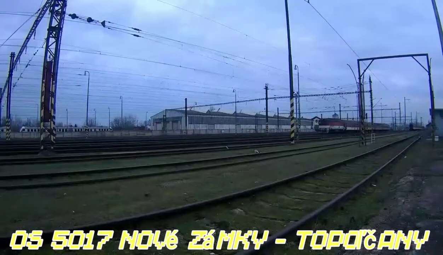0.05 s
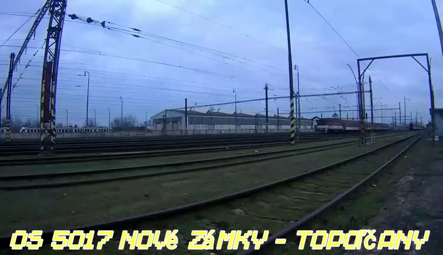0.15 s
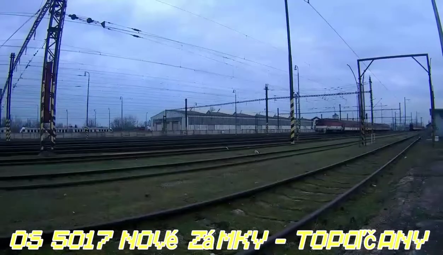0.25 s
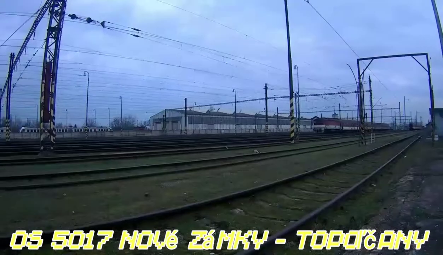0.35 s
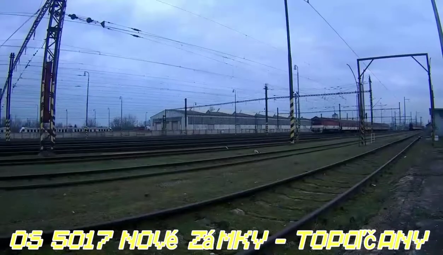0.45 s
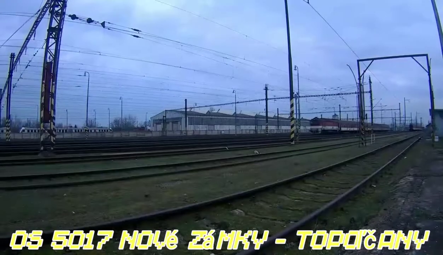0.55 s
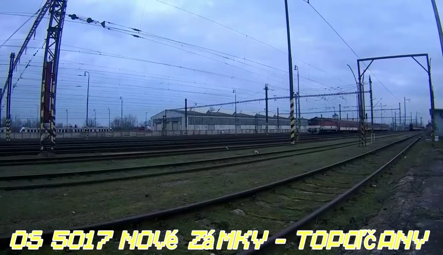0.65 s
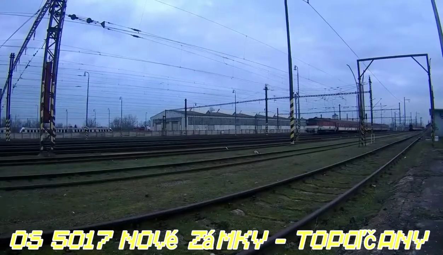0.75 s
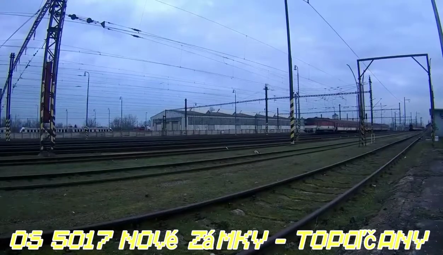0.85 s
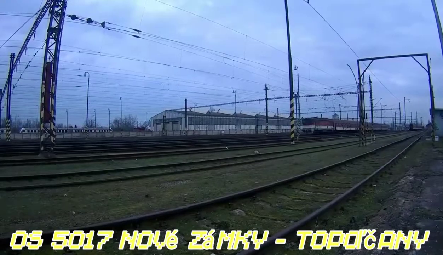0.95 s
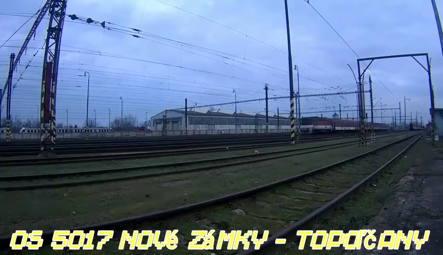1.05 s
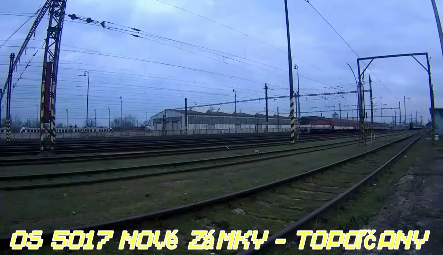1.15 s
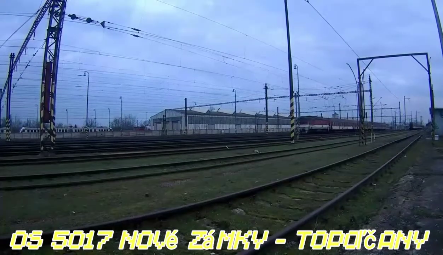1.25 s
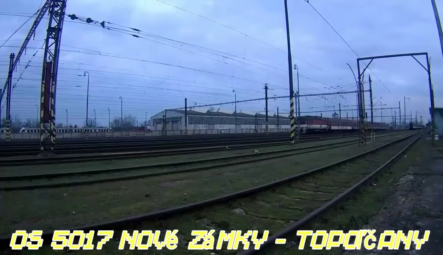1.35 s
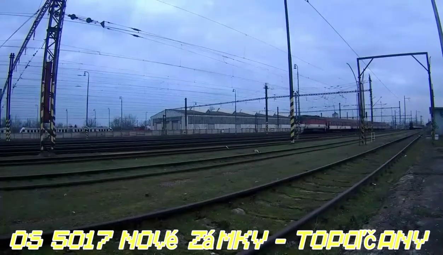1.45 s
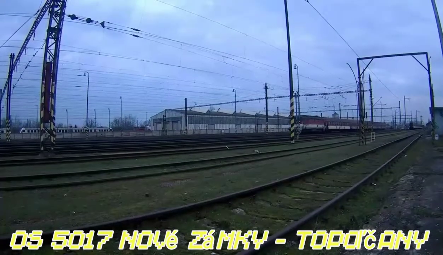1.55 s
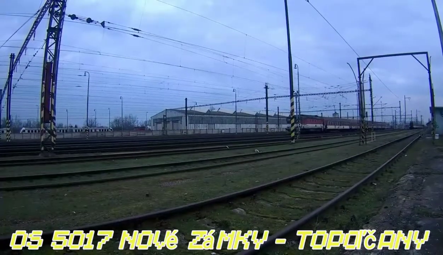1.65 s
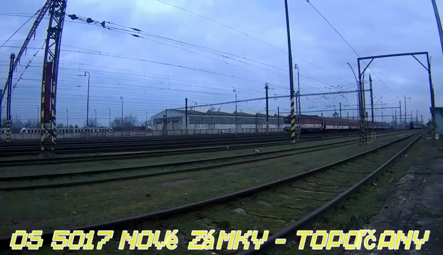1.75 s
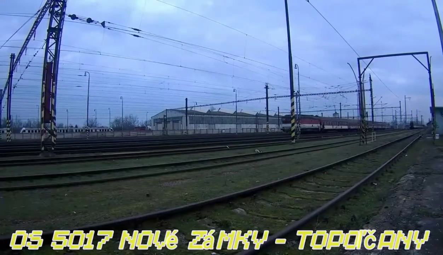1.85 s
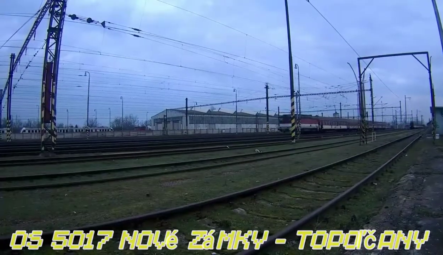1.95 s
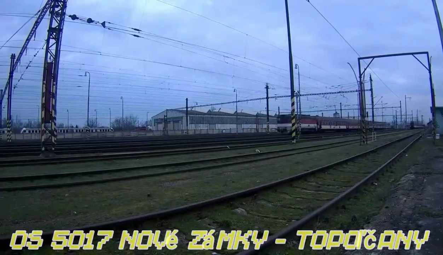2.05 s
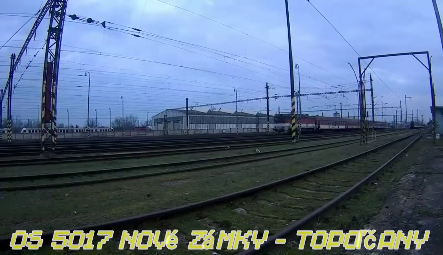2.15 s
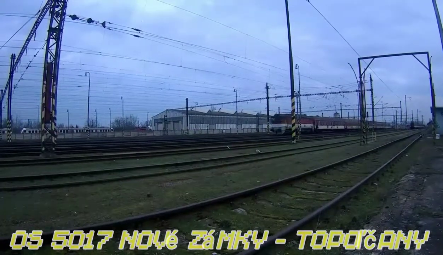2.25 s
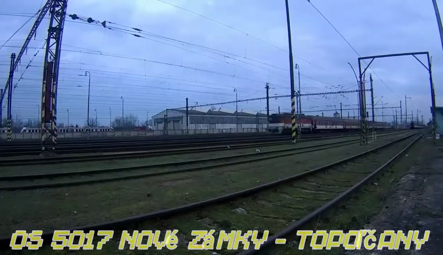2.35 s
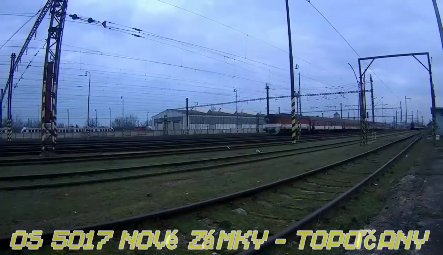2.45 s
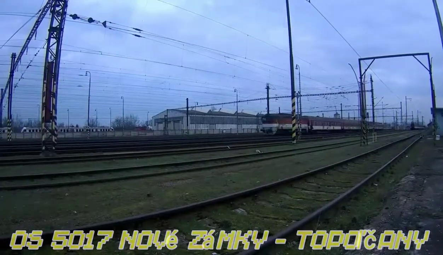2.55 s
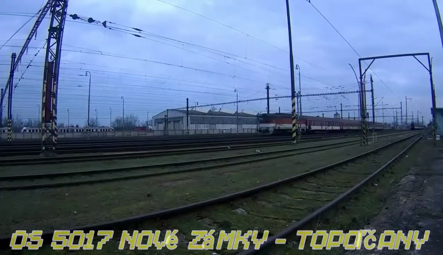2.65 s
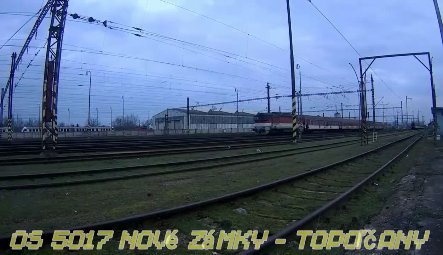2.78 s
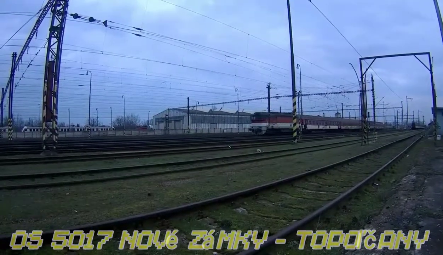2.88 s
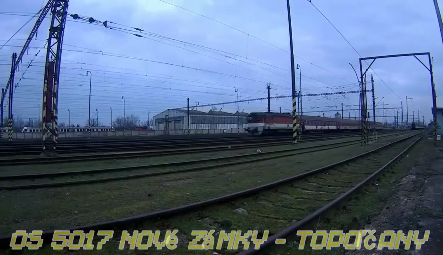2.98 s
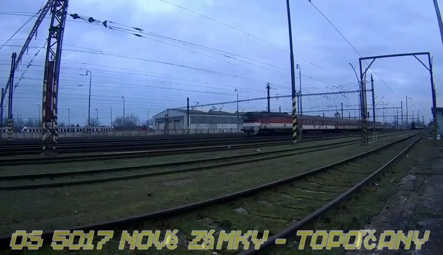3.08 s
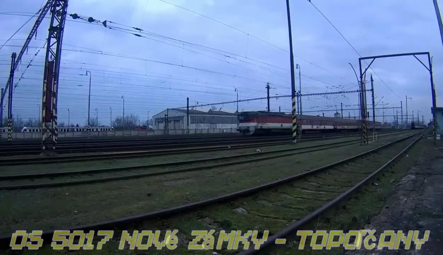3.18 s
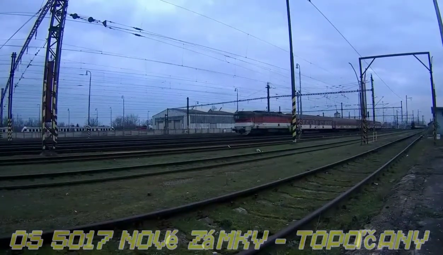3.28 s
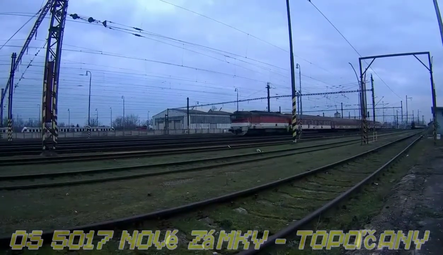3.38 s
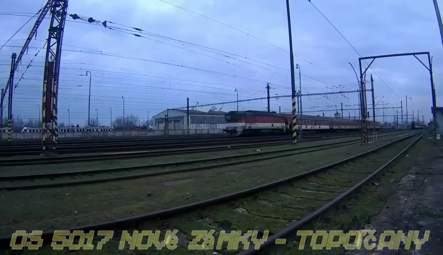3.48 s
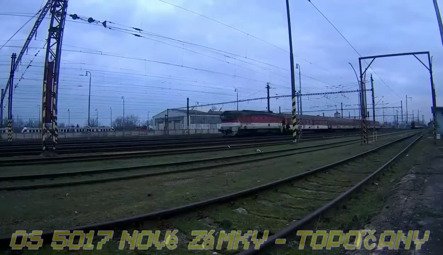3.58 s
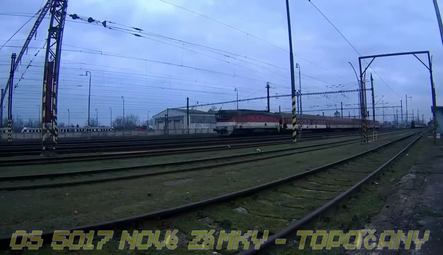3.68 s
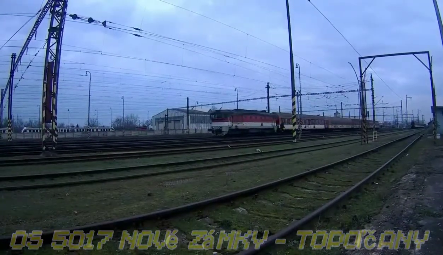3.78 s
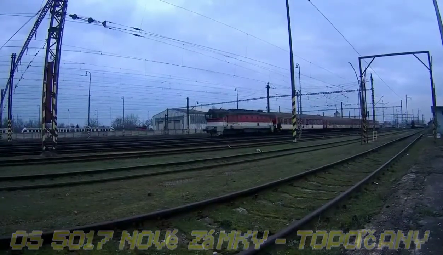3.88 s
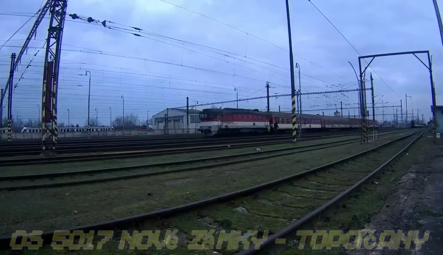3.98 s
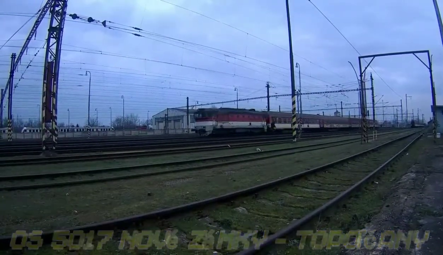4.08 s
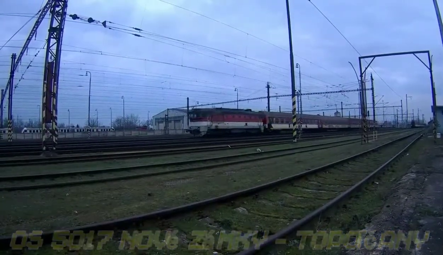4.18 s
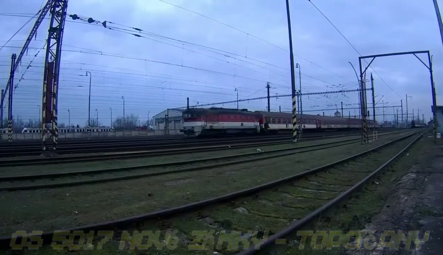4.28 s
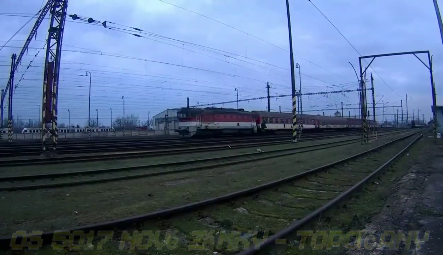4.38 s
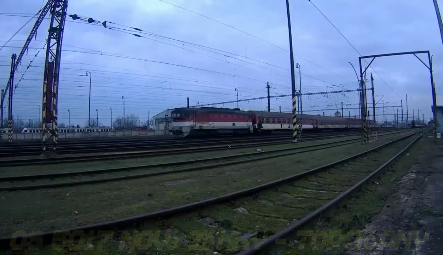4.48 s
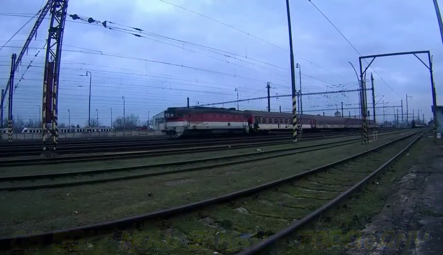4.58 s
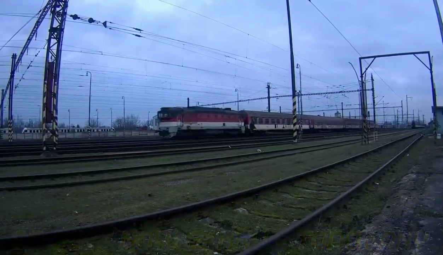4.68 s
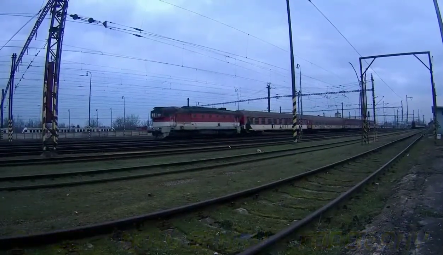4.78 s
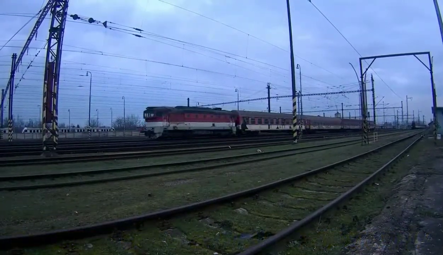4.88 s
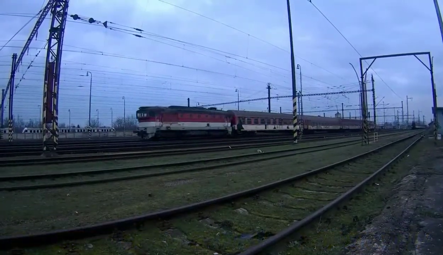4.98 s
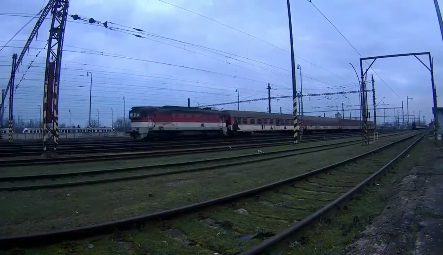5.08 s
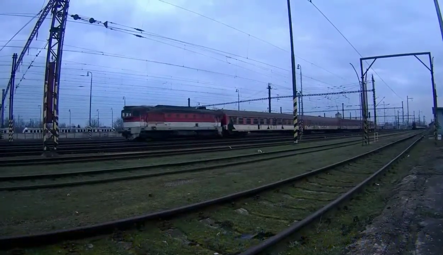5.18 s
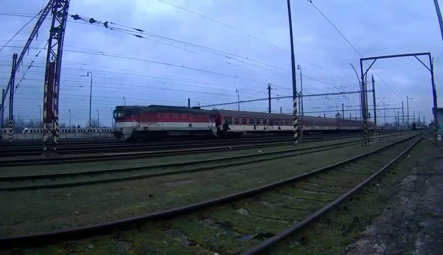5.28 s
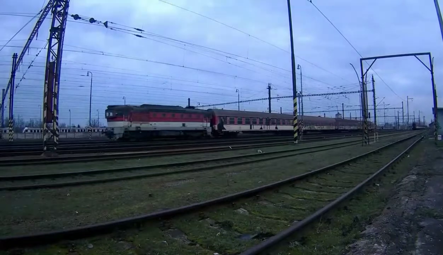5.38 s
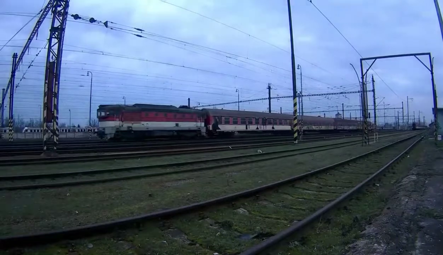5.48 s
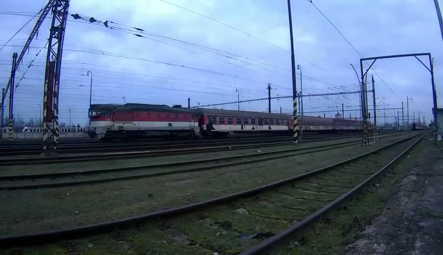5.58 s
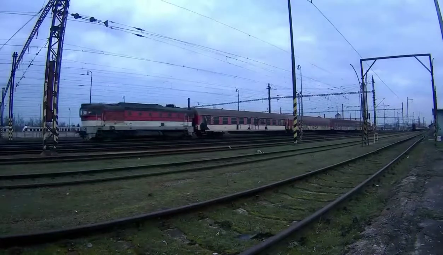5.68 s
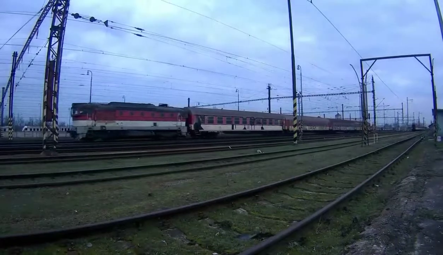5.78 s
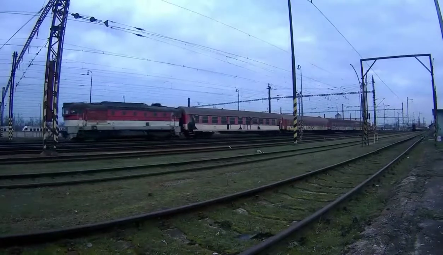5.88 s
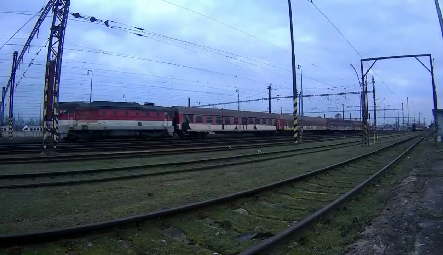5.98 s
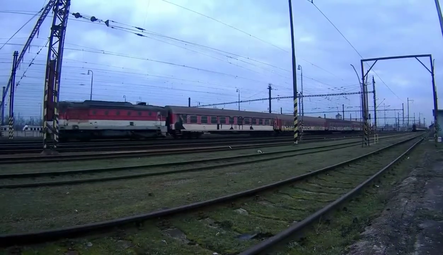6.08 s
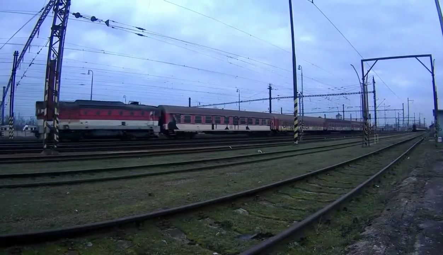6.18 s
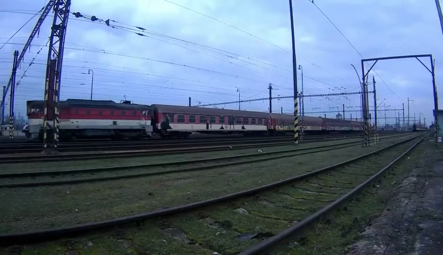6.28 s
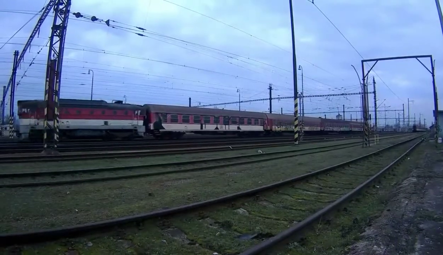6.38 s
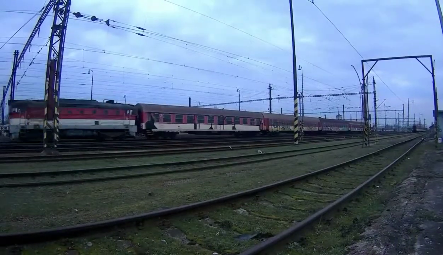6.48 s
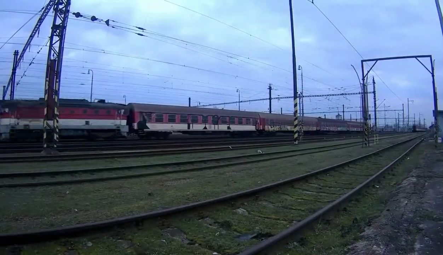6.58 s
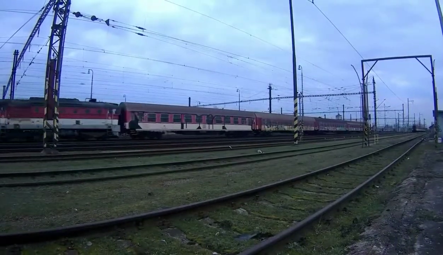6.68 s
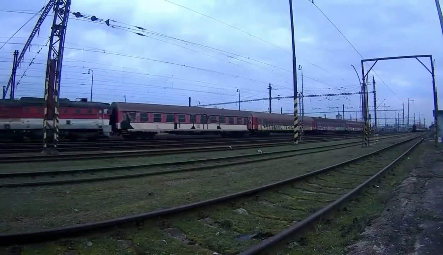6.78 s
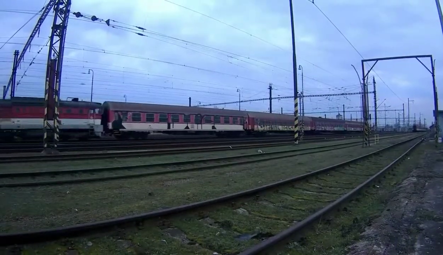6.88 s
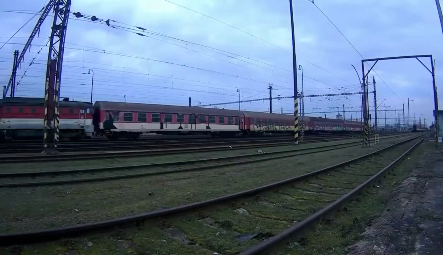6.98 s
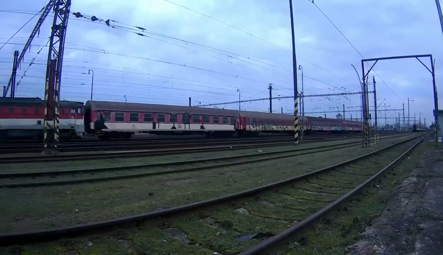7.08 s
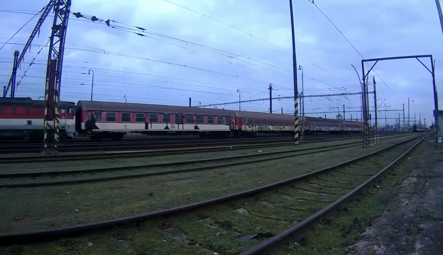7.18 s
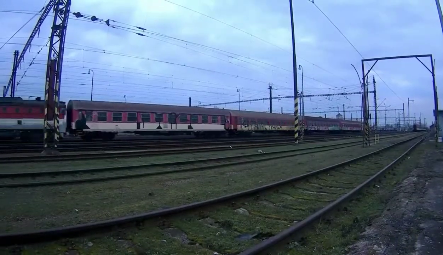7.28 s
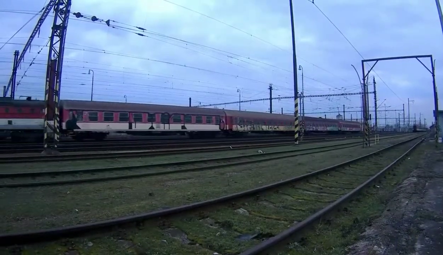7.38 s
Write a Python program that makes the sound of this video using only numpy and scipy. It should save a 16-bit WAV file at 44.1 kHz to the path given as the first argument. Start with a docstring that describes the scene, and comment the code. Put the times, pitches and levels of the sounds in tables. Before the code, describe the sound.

In an open railway yard, a diesel train approaches a fixed trackside microphone with a muffled, narrow sound. From 0 to 1.5 seconds a low, slow engine throb and soft ground rumble dominate, over a faint steady mains hum, with a few dull thuds. Between 1.7 and 3.2 seconds light paired axle knocks emerge and the rumble heaves in heavy lumps. From about 3.5 seconds the clatter hardens: double clacks over joints, loose steel rattle, rod knocks and a mid-low wavering wheel howl. A dense cluster of knocks and snaps comes around 4.3 to 4.6, another clatter near 5. Around 5.5 to 6 the wheels growl and roar more continuously. Strong thuds and bright clanks strike near 6.5, 6.7 and 7.3, with brief rough flange tones. Soft echoes trail the blows; it stops still loud near 7.45.

```python
"""A diesel locomotive draws its coaches across a railway yard, growing louder as it nears at a steady speed.
The slow engine throbs as a set of tones, under the rumble of the bogies made from low, lumpy noise.
The wheels roar and ring on the rails as noise shaped by their resonances.
Axles clatter and thud over points and rail joints as short noise bursts and fading tones.
The yard scatters each blow into soft echoes, and a mains hum hangs over it."""
import sys
import numpy as np
from scipy import signal
from scipy.fft import rfft, irfft
from scipy.io import wavfile
from scipy.ndimage import map_coordinates

SR = 44100
rng = np.random.default_rng(int(sys.argv[2]) if len(sys.argv) > 2 else 0)


def log_audio(samples):
    """Write samples as a 16-bit WAV file to the path given in sys.argv[1]."""
    # one column per channel
    frames = np.atleast_2d(samples).T
    # limit to full scale, then quantise
    limited = np.clip(frames, -1, 1)
    pcm = np.round(limited * 32767).astype(np.int16)
    wavfile.write(sys.argv[1], SR, pcm)


N = 328545  # samples in the scene
T = np.arange(N) / SR  # time of every sample, s
HZ = np.fft.rfftfreq(N, 1 / SR)  # frequencies of the spectrum


def gain_of(db):
    """Turns decibels into an amplitude."""
    return 10 ** (np.asarray(db) / 20)


def evened(x):
    """Scales a sound so that its average strength (rms) is 1."""
    return x / np.sqrt(np.mean(x ** 2) + 1e-20)


def curve(rows):
    """Joins the rows of a time table with straight lines, one value per sample."""
    return np.interp(T, *np.transpose(rows))


def read(points, hz):
    """Reads a spectrum table between its rows, on a log-frequency axis."""
    f, value = np.transpose(points)
    return np.interp(np.log(hz + 1), np.log(f + 1), value)


def add(mix, s, sound):
    """Mixes a sound in, starting at a given second."""
    part = mix[max(round(s * SR), 0):][:len(sound)]
    part += sound[:len(part)]


def noise(gain):
    """Random noise of rms 1 with the given gain at each frequency."""
    spectrum = rfft(rng.standard_normal(N))
    return evened(irfft(spectrum * gain, N))


def coloured(points):
    """Noise whose balance of low and high follows a table."""
    return noise(gain_of(read(points, HZ)))


def drift(rate_hz):
    """A random wander of rms 1, with little movement faster than the given rate."""
    return noise(np.exp(-(HZ / rate_hz) ** 2))


def gritty(points, grains_per_s=4000):
    """A dense spray of tiny steel impacts whose spectrum follows a table."""
    clicks = rng.standard_normal(N) * (rng.random(N) < grains_per_s / SR)
    return evened(irfft(rfft(clicks) * gain_of(read(points, HZ)), N))


def churned(x, patch_db=1.5, patch_hz=200, patch_s=0.051):
    """Many wheels come and go in the mix: short surges, each in its own range of pitch."""
    hz, t, z = signal.stft(x, SR, nperseg=512, noverlap=384)
    field = rng.standard_normal((len(t), len(hz))).T
    # smooth the random field across pitch and along time, so that it forms patches
    across = np.fft.fftfreq(len(hz), hz[1])[:, None] * patch_hz
    along = np.fft.fftfreq(len(t), t[1]) * patch_s
    smoothing = np.exp(-np.pi * (across ** 2 + along ** 2))
    patches = evened(np.fft.ifft2(np.fft.fft2(field) * smoothing).real)
    surging = signal.istft(z * gain_of(patch_db * patches), SR, nperseg=512, noverlap=384)[1]
    return evened(surging[:N])


def swells(rows):
    """A loudness curve of smooth rises and falls."""
    out = np.zeros(N)
    for middle, length, db in rows:
        add(out, middle - length / 2, gain_of(db) * np.hanning(int(length * SR)))
    return out


def blows(rows, rise, t60, hold=0):
    """A loudness curve of overlapping blows, whose powers add; rise, t60 (fall by 60 dB) and hold in s."""
    t = np.arange(SR) / SR
    onset = 1 - np.exp(-t / rise)
    shape = onset * gain_of(-60 * np.maximum(t - hold, 0) / t60)
    power = np.zeros(N)
    for s, db, *_ in rows:
        add(power, s, (gain_of(db) * shape) ** 2)
    return np.sqrt(power)


# Hum of the yard's power supply. Each row: frequency in Hz, rms level in dB.
MAINS_TONES = [(50, -37.5), (100, -51)]


def hum():
    """A steady mains hum: pure tones hang over the yard."""
    return sum(gain_of(db) * evened(np.sin(2 * np.pi * (hz * T + rng.random()))) for hz, db in MAINS_TONES)


# How long the yard echoes. Each row: frequency in Hz, time to fade by 60 dB in seconds.
YARD_FADE = [(100, 0.87), (1000, 0.84), (5000, 0.55)]


def yard(x, echoes_per_s=1500, first_echo_s=.025):
    """Sheds, masts and the train's own sides scatter sound into random echoes that fade fastest in the treble."""
    echoes = rng.standard_normal(SR) * (rng.random(SR) < echoes_per_s / SR)
    echoes = echoes * (np.arange(SR) / SR > first_echo_s)
    hz, t, z = signal.stft(echoes, SR, nperseg=256)
    fade = gain_of(-60 * t / read(YARD_FADE, hz)[:, None])
    tail = signal.istft(z * fade, SR, nperseg=256)[1]
    return signal.fftconvolve(x, tail / np.linalg.norm(tail))[:N]


# A flange touches the rail and one wheel mode sings out.
# Each row: start in seconds, length in seconds, middle pitch in Hz, level in dB before its swell and fade.
FLANGE_TOUCHES = [(6.476,0.039,1453,-37),(6.477,0.036,2050,-35),(6.501,0.24,986,-39.5),(7.17,0.22,862,-40)]


def flanges(waver=0.017, rub_db=1.5):
    """Brief rough tones that swell and fade as the flange rubs."""
    out = np.zeros(N)
    for s, length, hz, db in FLANGE_TOUCHES:
        count = int(length * SR)
        turns = np.cumsum(hz * (1 + waver * drift(70)[:count])) / SR
        tone = np.sin(2 * np.pi * turns) * gain_of(rub_db * drift(45)[:count])
        add(out, s, gain_of(db) * evened(tone) * np.hanning(count))
    return out


# The wheels' lowest resonance howls, stronger from the points on.
# Each row: time in seconds, middle pitch in Hz, level in dB.
HOWL_PATH = [(0, 632, -65), (3.3, 622.3, -55.5), (3.599, 617.5, -45.5), (4.25, 601.7, -47.5),
             (4.55, 595, -40), (4.85, 595, -47), (5.2, 591.7, -47.5), (6.099, 603.3, -42.5),
             (6.6, 613.4, -43), (7.45, 592.4, -44)]


def howl(width_hz=46, waver=0.016, broken_db=0.1):
    """A wavering, broken resonance holds on under the roar: slow noise moved up to the howl's pitch."""
    times, hz, db = np.transpose(HOWL_PATH)
    pitch = np.interp(T, times, hz) * (1 + waver * drift(7))
    angle = 2 * np.pi * np.cumsum(pitch) / SR
    band = drift(width_hz) * np.cos(angle) + drift(width_hz) * np.sin(angle)
    return gain_of(np.interp(T, times, db)) * evened(band * gain_of(broken_db * drift(10)))


# A bogie crosses a rail joint, one axle after the other. Each row: first blow in seconds, its strength in dB,
# second blow relative to the first in dB, extra strength of the bright tick in dB.
JOINTS_CROSSED = [(1.76, -34, -10, -14), (1.96, -34.5, -3, -10), (2.39, -37, 8.5, -8.5),
                  (2.652, -29.5, -2.5, -4), (3.236, -26.5, -1, -7), (3.451, -29.5, 3, -2),
                  (3.487, -22, -3, -3.5), (3.707, -20, -5.5, -6), (3.894, -26.5, 0, -2.5),
                  (4.116, -26, -4.5, -5), (4.29, -22, 3, -0.5), (4.507, -21, 0, -7.5),
                  (4.943, -19, -5, -2.5), (5.167, -22, -3.5, 3.5), (5.36, -23.5, 1.5, -1),
                  (5.65, -25, -1, -1), (6.083, -23, -6, -5), (6.312, -25.5, -5, -9),
                  (6.487, -19, -3.5, 1.5), (6.713, -21, -3.5, 5), (7.148, -22, -5, 5.5),
                  (7.364, -22.5, -3, 8)]


def axles(axle_gap_s=.062):
    """Each bogie strikes twice, an axle gap apart; lists seconds, strength in dB, tick brightness in dB."""
    strikes = []
    for s, db, second_db, bright_db in JOINTS_CROSSED:
        strikes.append((s, db, bright_db))
        strikes.append((s + axle_gap_s, db + second_db, bright_db))
    return strikes


# How the rail shakes, hardest over the points. Each row: time in seconds, shaking in dB.
RAIL_SHAKING = [(0, -48.5), (1.4, -49.5), (2.6, -42.5), (3.35, -44), (3.65, -38), (4.15, -40.5),
                (4.5, -37.5), (6.05, -40.5), (7.45, -39)]
# Colour of ringing steel and rail hiss. Each row: frequency in Hz, relative strength in dB per Hz.
STEEL_COLOUR = [(300, -26.5), (700, -1), (1150, -2), (1500, 2.5), (1750, -1), (2050, -2), (2250, -5),
                (2650, -6.5), (2950, -15), (3400, -21), (3750, -26)]


def rattle(count=24, order=6, knocks_per_s=130, rattle_db=-7.5, jolt_db=-17.0, spread_db=3.5,
           t60=.06, low_hz=650, high_hz=3400):
    """Loose brake rigging and couplings, each with its own few modes, knock at random, harder after joints."""
    t, out = np.arange(SR // 8) / SR, np.zeros(N)
    part = rng.integers(0, count, N)
    strength = gain_of(spread_db * np.minimum(rng.exponential(1, N), 3))
    knocks = strength * (rng.random(N) < knocks_per_s / SR)
    for k in range(count):
        hz = low_hz + (high_hz - low_hz) * (np.arange(order)[:, None] + rng.random((order, 1))) / order
        modes = gain_of(read(STEEL_COLOUR, hz)) * np.sin(2 * np.pi * (hz * t + rng.random((order, 1))))
        ring = modes.sum(0) * gain_of(-60 * t / t60)
        for at in np.flatnonzero(knocks * (part == k)):
            add(out, at / SR, knocks[at] * ring)
    jolts = gain_of(jolt_db) * blows(axles(), rise=0.046, t60=0.48)
    shaking = np.hypot(gain_of(curve(RAIL_SHAKING) + rattle_db), jolts)
    return shaking * evened(out)


def clangs(rows, clang_db, longest_t60, count=12, rise=0.0078, low_hz=790, high_hz=2876):
    """Every blow rings a different piece of steel, with its own scatter of fading modes."""
    t, out = np.arange(SR // 3) / SR, np.zeros(N)
    onset = 1 - np.exp(-t / rise)
    for s, db, *_ in rows:
        place, phase, damping = rng.random((3, count, 1))
        hz = low_hz * (high_hz / low_hz) ** ((np.arange(count)[:, None] + place) / count)
        size = gain_of(read(STEEL_COLOUR, hz))
        fade = gain_of(-60 * t / longest_t60 * (1.0 + damping))
        modes = size * np.sin(2 * np.pi * (hz * t + phase)) * fade
        add(out, s, gain_of(db + clang_db) * onset * modes.sum(0) / np.linalg.norm(size))
    return out


# The wheel's resonances. Each row: pitch in Hz, half-width in Hz (where it is 6 dB down), relative level in dB.
WHEEL_MODES = [(543,38,-1),(678,56,-1),(920,45,-7.5),(986,32,-1),(1407,86,-2.5),(2005,87,-3.5),(2647,33,-9.5),(3300,130,-13.5)]


def wheel_ring(wander=0.005, wander_hz=2.5):
    """The wheel's resonances, shaken at random; their pitch wanders as one wheel takes over from another."""
    power = sum(gain_of(db) ** 2 / (1 + ((HZ - hz) / width) ** 2) ** 2 for hz, width, db in WHEEL_MODES)
    ring = noise(np.sqrt(power))
    # reading the ring a little faster or slower bends its pitch
    place = np.cumsum(1 + wander * drift(wander_hz))
    return map_coordinates(ring, [place], order=3, mode="wrap")


# A coupling or brake rod knocks hard. Each row: start in seconds, strength in dB.
ROD_KNOCKS = [(3.58, -29), (3.643, -31), (4.41, -23), (4.474, -20.5), (4.55, -20), (4.611, -22.5),
              (4.886, -34.5), (5.252, -37.5), (6.59, -32), (7.335, -25)]
# A wheel clips the nose of a crossing with a sharp snap. Each row: start in seconds, strength in dB.
CROSSING_SNAPS = [(4.3628, -27), (4.512, -20), (4.586, -20.5), (5.178, -32), (6.498, -25.5), (7.373, -19.5)]
# Colour of the steely tick, then of the wheel roar. Each row: frequency in Hz, relative strength in dB per Hz.
STEELY_TICK_COLOUR = [(1200, -32), (2500, 0.5), (3500, 3.5), (4000, 6.5)]
WHEEL_ROAR_COLOUR = [(200, -23), (320, -5), (420, -3), (520, -4), (620, -2.5), (730, -3), (880, 1),
                     (1100, -3.5), (1500, -13), (3000, -49.5)]


def clatter(crash_db=-13.0, ring_db=-17.0, tick_db=-18.0, shudder_db=-17.0):
    """Joints tick and crash the running gear, then wheel and track shudder; rods tick and crossings snap."""
    strikes = axles()
    bright = [(s, db + bright_db) for s, db, bright_db in strikes]
    tick_shape = blows(bright + ROD_KNOCKS, rise=0.0041, t60=0.11, hold=0.022)
    tick = gain_of(tick_db) * tick_shape * gritty(STEELY_TICK_COLOUR)
    crash_shape = blows(strikes, rise=0.0039, t60=0.11, hold=0.026)
    crash = gain_of(crash_db) * crash_shape * churned(gritty(STEEL_COLOUR))
    snap = blows(CROSSING_SNAPS, rise=0.00042, t60=0.0079) * coloured(STEEL_COLOUR)
    ring = gain_of(ring_db) * blows(strikes, rise=0.0027, t60=0.4) * churned(wheel_ring())
    shudder_shape = blows(strikes, rise=0.053, t60=.7)
    shudder = gain_of(shudder_db) * shudder_shape * churned(coloured(WHEEL_ROAR_COLOUR))
    return tick + crash + snap + ring + shudder


# Axles drop into the gaps. Each row: start in seconds, strength of the ring in dB,
# strength of the deep shove relative to the ring in dB.
AXLE_DROPS = [(0.6,-31,0.5),(1.04,-30.5,6.5),(1.53,-29.5,-2),(1.865,-28,-4.5),(2.15,-25.5,-8),(2.36,-32,3),(2.476,-23.5,-3),(2.634,-25,-1),(2.78,-32,-3.5),(2.963,-23,-4),(3.238,-23.5,5),(3.492,-22.5,9),(3.715,-25,5),(3.831,-32,-8),(4.312,-24.5,12),(4.349,-26.5,4),(4.41,-27,9),(4.516,-25.5,1.5),(4.955,-27,-4.5),(5.177,-26.5,8.5),(6.011,-28.5,16.5),(6.514,-15.5,1),(6.738,-14.5,2),(6.885,-28.5,-10),(7.14,-26,-6),(7.334,-15.5,-1.5)]
# Modes of the bogie frame. Each row: middle pitch in Hz, relative level in dB, time to fade by 60 dB in seconds.
BOGIE_MODES = [(109.4,2,0.16),(140.4,8,0.17),(171.2,0.5,0.24),(186.8,3.5,0.18),(230,-4.5,0.11),(270,-9.5,0.1)]


def thuds(thud_db=0.0, rise=0.0028, scatter=.04, shove_hz=60, shove_t60=0.15):
    """A dropping axle shoves the track and rings the bogie frame, each one a little differently."""
    t, out = np.arange(SR // 2) / SR, np.zeros(N)
    onset = 1 - np.exp(-t / rise)
    shove = -np.sin(2 * np.pi * shove_hz * t) * gain_of(-60 * t / shove_t60) * onset
    shove = shove / abs(shove).max()
    for s, db, shove_db in AXLE_DROPS:
        draws = rng.uniform(-1.01, 1, (len(BOGIE_MODES), 2))
        ring = np.zeros(len(t))
        for (hz, mode_db, t60), (detune, phase) in zip(BOGIE_MODES, draws):
            wave = np.sin(2 * np.pi * hz * (1 + scatter * detune) * t + np.pi * phase)
            ring += onset * gain_of(mode_db - 60 * t / t60) * wave
        add(out, s, gain_of(db + thud_db) * (ring / abs(ring).max() + gain_of(shove_db) * shove))
    return out


def nearness(speed_m_per_s=16.46, track_m=30.9, abreast_s=8.02):
    """Track distance over the locomotive's distance: 1 when abreast, which comes just after the sound ends."""
    return track_m / np.hypot(track_m, speed_m_per_s * (abreast_s - T))


def approach(abreast_db, growth):
    """Level in dB, rising as the distance shrinks; growth is dB gained per dB of nearness."""
    return abreast_db + growth * 20 * np.log10(nearness())


# Wheels growl over a rough stretch of rail. Each row: middle in seconds, length in seconds, level at the middle in dB.
ROUGH_STRETCHES = [(1.38, 0.13, -50), (1.545, 0.06, -46), (1.6, 0.24, -47), (2.48, 0.11, -47.5),
                   (3.738, 0.034, -39), (4.775, 0.15, -38), (5.502, 0.029, -33), (5.8, 0.78, -41.5),
                   (6.15, 0.4, -41.5)]
# Colour of that growl. Each row: frequency in Hz, relative strength in dB per Hz.
WHEEL_GROWL_COLOUR = [(180, -24), (330, -2), (600, 1.5), (850, -2.5), (1300, -13.5), (3000, -48.5)]


def rolling(hiss_db=-3.0, judder_db=0.3, chatter_db=0.5):
    """Rough treads on rough rails: roar, growl, wheel ring and hiss judder together."""
    judder = drift(24)
    roar = gain_of(approach(abreast_db=-37, growth=1.063)) * churned(coloured(WHEEL_ROAR_COLOUR))
    growl = swells(ROUGH_STRETCHES) * churned(coloured(WHEEL_GROWL_COLOUR))
    ring = gain_of(approach(abreast_db=-36.5, growth=1.92)) * churned(wheel_ring())
    hiss_level = gain_of(curve(RAIL_SHAKING) + hiss_db + chatter_db * judder)
    hiss = hiss_level * churned(coloured(STEEL_COLOUR))
    return gain_of(judder_db * judder) * (roar + growl + ring) + hiss


# Firm low surges, a few cycles each.
# Each row: middle in seconds, length in seconds, pitch in Hz, level at the middle in dB.
LOW_SURGES = [(1.873, 0.38, 22.6, -21), (2.345, 0.091, 24, -14), (2.808, 0.13, 29, -17.5),
              (2.941, 0.068, 22, -8.5), (4.171, .13, 27, -12.5), (4.634, 0.067, 30, -14.5),
              (6.106, 0.085, 28, -14), (7.393, 0.1, 62, -15.5)]


def surges():
    """The rumble gathers into short, heavy swings: low tones that swell and fade."""
    out = np.zeros(N)
    for middle, length, hz, db in LOW_SURGES:
        t = np.arange(-length / 2, length / 2, 1 / SR)
        swing = np.sin(2 * np.pi * (hz * t + rng.random()))
        add(out, middle - length / 2, gain_of(db) * np.hanning(len(t)) * swing)
    return out


# The deep rumble swells. Each row: middle in seconds, length in seconds, level at the middle in dB.
GROUND_HEAVES = [(.68, 0.94, -29), (1.9, 0.28, -25.5), (2.47, 0.49, -24), (2.88, 0.87, -29.5),
                 (3.55, 0.7, -27), (4.25, 0.7, -24), (4.62, 0.35, -26), (5.35, 0.58, -29.5)]
# Colours of the shaking ground, then of the bogies' drone.
# Each row: frequency in Hz, relative strength in dB per Hz.
GROUND_SHAKE_COLOUR = [(4, -15.5), (12, 3), (33, 4.5), (60, 0), (95, -3), (130, -16.5), (300, -72.5)]
BOGIE_DRONE_COLOUR = [(60,-4),(98,0),(130,-0.5),(160,-0.5),(195,1),(230,-1),(268,-1.5),(310,-13.5),(420,-22.5),(800,-60)]


def rumble(hardest_db=-32, growth=0.73, throb_db=1.5, shudder_db=-12.0):
    """The ground shakes and the bogies drone in uneven lumps, and go on shuddering after each thud."""
    ground_level = np.hypot(gain_of(approach(abreast_db=-31.5, growth=0.26)), swells(GROUND_HEAVES))
    ground = ground_level * coloured(GROUND_SHAKE_COLOUR)
    shaking = curve(RAIL_SHAKING)
    # the drone gains "growth" dB for each dB of rail shaking
    drone = gain_of(hardest_db + growth * (shaking - shaking.max()) + throb_db * drift(rate_hz=13))
    shudder = gain_of(shudder_db) * blows(AXLE_DROPS, rise=0.029, t60=.6)
    return ground + np.hypot(drone, shudder) * coloured(BOGIE_DRONE_COLOUR)


# Crank cycles as heard, sinking a little as the locomotive draws level.
# Each row: time in seconds, cycles per second before a slight waver.
CRANK_CYCLE = [(0, 6.13), (3, 6.13), (5, 6.07), (6.5, 6.02), (7.45, 5.94)]
# Exhaust tones. Each row: multiple of the crank cycle, then level in dB head on, at a slant and side on.
EXHAUST_TONES = [(2, -44.5, -39.5, -44.5), (3, -32.5, -28.5, -25), (4, -35.5, -33, -37.5),
                 (5, -53.5, -35.5, -26), (6, -40.5, -31.5, -40), (7, -43, -41.5, -25.5),
                 (8, -49, -44.5, -39.5), (9, -40.5, -41.5, -33), (10, -51.5, -45, -33.5),
                 (12, -44, -48, -31.5), (13, -49.5, -49.5, -46.5), (14, -47.5, -45.5, -44.5),
                 (15, -51.5, -48, -50), (17, -51, -53, -53), (18, -55, -52, -52), (23, -67.5, -56.5, -44.5),
                 (32, -69.5, -61.5, -49)]
# Seconds at which the exhaust is heard head on, at a slant and side on.
EXHAUST_TURN_S = (0.65, 3.4, 6.9)


def engine(waver=0.00052, flutter_db=1.0):
    """Unequal cylinders give tones at multiples of the crank cycle; the balance shifts as it turns side on."""
    turns = np.cumsum(curve(CRANK_CYCLE) * (1 + waver * drift(1.8))) / SR
    out = np.zeros(N)
    for multiple, *levels in EXHAUST_TONES:
        level = gain_of(np.interp(T, EXHAUST_TURN_S, levels) + flutter_db * drift(4.9))
        out += level * evened(np.cos(2 * np.pi * (round(multiple) * turns + rng.random())))
    return out


def scene(echo_db=-8.0):
    """The whole train, heard from beside the tracks; only the blows are echoed by the yard."""
    steel = clangs(axles(), clang_db=-9.0, longest_t60=0.13) + clangs(ROD_KNOCKS, clang_db=-3.5, longest_t60=0.2)
    hits = clatter() + steel + rattle() + thuds() + flanges()
    background = hum() + gain_of(echo_db) * yard(hits)
    train = engine() + rumble() + surges() + rolling() + howl() + hits
    return (background + train)[None]


def low_pass(x, edge_hz):
    """A steep filter that removes what lies above the edge."""
    return signal.oaconvolve(x, signal.firwin(511, edge_hz, window=("kaiser", 9), fs=SR)[None], "same")


# How much of the mirror image leaks through. Each row: frequency in Hz, gain in dB.
MIRROR_LEAK = [(4100, -0.5), (4650, -11), (5300, -24), (5700, -38.5), (6200, -56.5), (7500, -70.5)]


def record(dry, band_hz=3850, sampling_hz=8000, edge_hz=8400):
    """A muffled microphone that samples slowly: a faint mirror image of the sound lies above its narrow band."""
    narrow = low_pass(dry, band_hz)
    mirrored = narrow * 2 * np.cos(2 * np.pi * sampling_hz * T)
    image = irfft(rfft(mirrored) * gain_of(read(MIRROR_LEAK, HZ)), N)
    return low_pass(narrow + image, edge_hz)


dry = scene()
out = record(dry)
log_audio(out)
```